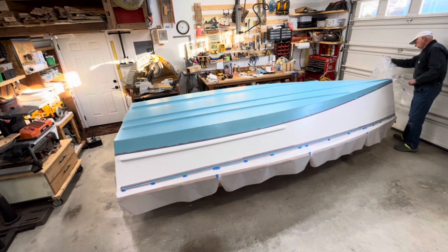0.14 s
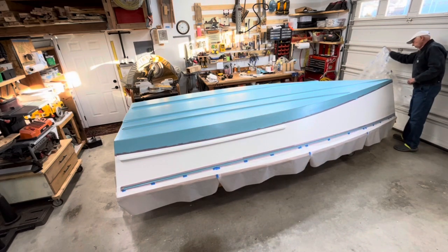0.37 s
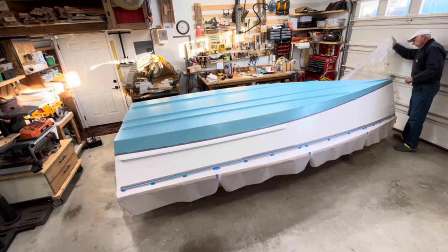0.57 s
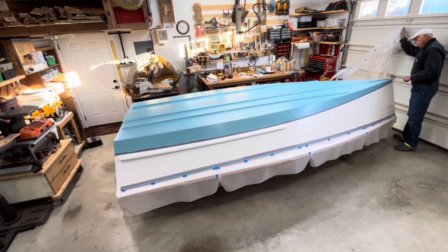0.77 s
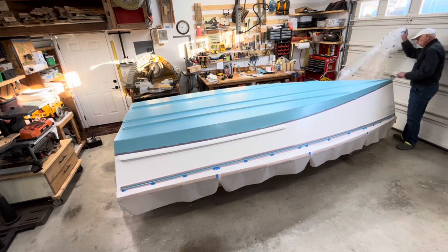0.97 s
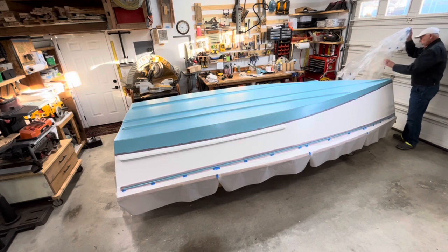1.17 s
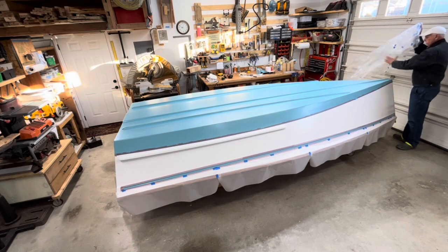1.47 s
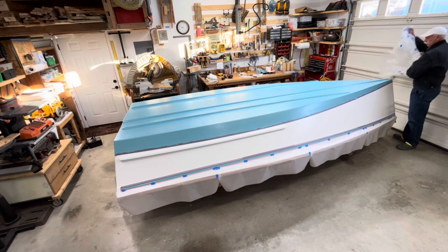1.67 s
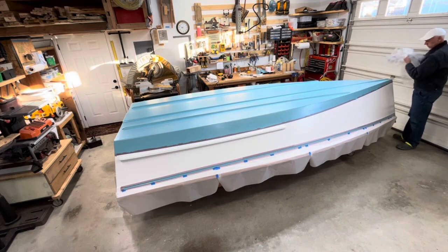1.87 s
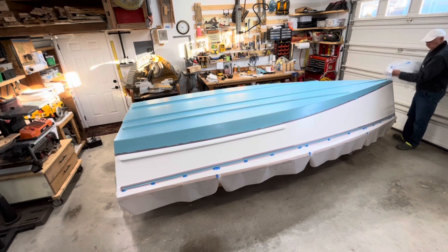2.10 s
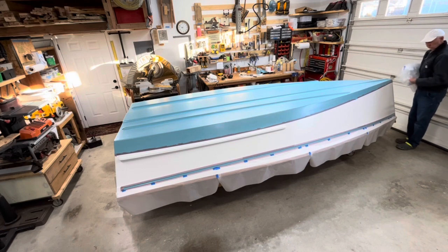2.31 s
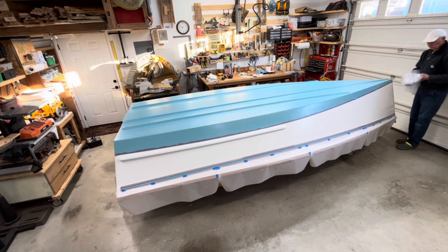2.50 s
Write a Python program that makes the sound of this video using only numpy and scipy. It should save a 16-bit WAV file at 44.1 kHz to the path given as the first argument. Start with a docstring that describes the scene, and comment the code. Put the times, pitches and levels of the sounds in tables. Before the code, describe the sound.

Thin plastic sheeting crinkles faintly, thumps and flaps as it is yanked off a boat hull in two bright swishes, settles briefly, then is crumpled in the hands; close stereo in a quiet, lightly echoing workshop.

```python
"""A faint crinkle, then a thump and a tug: a thin plastic drop cloth is pulled off a boat hull.
It flaps, slides off in two bright sweeps, billows, and is then bunched up by hand in a workshop.
Crinkle, rustle, flaps, thumps and puffs of air are random clicks, shaped in pitch, in a room.
Large folds are ringing bursts of clicks, popping facets are short tones, the swish is smooth noise.
Soft steady noise is the quiet of the workshop."""
import sys
import numpy as np
from scipy import signal
from scipy.fft import rfft, irfft
from scipy.io import wavfile
from scipy.ndimage import uniform_filter1d

SR = 44100
rng = np.random.default_rng(int(sys.argv[2]) if len(sys.argv) > 2 else 0)


def unload_audio(sound):
    """Save the sound as a 16-bit wav file, at the path given as the first command line argument."""
    columns = np.transpose(np.atleast_2d(sound))
    # keep every value between -1 and 1, then stretch to whole-number steps
    steps = np.round(np.clip(columns, -1, 1) * 32767)
    wavfile.write(sys.argv[1], SR, steps.astype(np.int16))


N = 116865
TIME = np.arange(N) / SR
HZ = np.maximum(np.arange(N // 2 + 1) * SR / N, 1)  # kept above zero for the logarithms

# Levels while the sheet is pulled off, before the PULL trims: time_s, crinkle_db, rustle_db
PULL_LEVELS = [(0, -51.5, -48.5), (.07, -52.5, -60), (.16, -52, -57), (.208, -52.5, -52.5),
               (.23, -41.5, -46.5), (0.281, -49, -47.5), (.358, -47.5, -46.5), (.398, -33, -38.5),
               (.45, -37, -36), (.49, -41, -39.5), (.545, -41, -40.5), (.6, -46.5, -45.5),
               (.69, -40, -42.5), (0.759, -46, -40), (.81, -44, -44.5), (.88, -50, -49.5), (1.0, -56, -59),
               (1.11, -53.5, -56.5), (1.38, -58, -59)]
# Levels while it is bunched up, before the BUNCH trims: time_s, crinkle_db, rustle_db
BUNCH_LEVELS = [(1.412, -50, -60), (1.424, -44.5, -51), (1.49, -39.5, -43), (1.605, -40, -43),
                (1.72, -46.5, -49), (1.8, -44.5, -49), (1.9, -41.5, -47.5), (2.045, -44.5, -45.5),
                (2.09, -47.5, -49.5), (2.26, -45.5, -49), (2.38, -47.5, -47.5), (2.48, -50.5, -53),
                (2.55, -49.5, -50.5), (2.65, -54, -51.5)]
# Added to the levels above
PULL_CRINKLE_TRIM_DB, PULL_RUSTLE_TRIM_DB = 4, 5
BUNCH_CRINKLE_TRIM_DB, BUNCH_RUSTLE_TRIM_DB = 2.5, 4.5

# Tone of the open sheet's fine creases, only the shape matters: pitch_hz, level_db (per Hz)
CRINKLE_TONE = [(500, -94), (1500, -3), (3000, -0.5), (4500, -2), (6500, -2), (8000, -4.5), (9400, -1.5),
                (10500, -7.5), (12300, -8.5), (13300, -23), (15500, -15.5)]
# Tone of its wider folds, only the shape matters: pitch_hz, level_db (per Hz)
RUSTLE_TONE = [(40, -26), (90, -4), (150, -10.5), (220, 0), (330, -1), (600, 0), (1300, 0), (2800, -2),
               (4500, -3), (8000, -6.5), (15000, -32)]
# Tone of the bunched sheet's fine creases, only the shape matters: pitch_hz, level_db (per Hz)
WAD_CRINKLE_TONE = [(500, -37), (1500, -10), (3000, -4), (4600, 0.5), (6500, -3), (8000, -2.5),
                    (9400, -1.5), (10500, -7), (12300, -6.5), (13300, -25), (15500, -16.5)]
# Tone of its wider folds, only the shape matters: pitch_hz, level_db (per Hz)
WAD_RUSTLE_TONE = [(40, -23), (90, -10), (200, -6.5), (330, -1.5), (600, 0), (1200, 0), (2800, -2.5),
                   (4500, -7.5), (8000, -10), (15000, -32)]
SNAPS_PER_S, WAD_SNAPS_PER_S, FOLDS_PER_S = 3500, 2200, 1500
SIZE_SPREAD_DB = 3.5  # average extra size of a click above the smallest
PLACES = 3  # spots on the sheet that share the clicks

# Single facets popping in the wad; TICK_DB is relative to crinkle_db in BUNCH_LEVELS
TICKS_PER_S, TICK_DB, TICK_SPREAD_DB = 70, -4.5, 3  # spread is plus or minus
TICK_LOW_HZ, TICK_HIGH_HZ = 1497, 9070
TICK_CYCLES = 10  # cycles until the ring has faded to about a third

# The film slides fast over the hull: full_speed_s, level_db, rise_s, fall_s
SLIDES = [(0.397, -32.5, 0.019, 0.027), (.754, -33.5, 0.026, 0.035)]
# Tone of the sliding film, only the shape matters: pitch_hz, level_db (per Hz)
SWISH_TONE = [(1000, -31), (3000, -4.5), (5500, -6.5), (6700, -0.5), (8000, 0), (9400, -2), (10500, -6.5),
              (12300, -6.5), (13300, -29), (15500, -26)]

# The first thump's body and upper edge (first two rows), then large folds giving way:
# start_s, level_db, resonance_hz, width_hz, decay_s (time constant)
CRUMPLES = [(.212, -45, 1200, 750, 0.11), (.236, -41, 536, 260, .022), (.372, -37.5, 6700, 1300, 0.039),
            (.432, -33, 2700, 2170, 0.065), (.73, -37.5, 5600, 2000, 0.061), (1.414, -45, 4760, 350, 0.025),
            (1.535, -47, 4600, 1600, .06), (1.69, -49, 6800, 900, .018), (1.775, -52, 7300, 1100, .02),
            (2.015, -48.5, 4430, 1500, .045), (2.425, -52, 1840, 500, .018), (2.53, -49, 1220, 800, .03)]
CRUMPLE_ATTACK_S, CRUMPLE_SNAPS_PER_S = 0.0094, 1800

# The slack sheet flaps; from 1.42 s, low thumps as handfuls of the wad are crumpled:
# start_s, level_db, decay_s (time constant)
FLAPS_AND_THUMPS = [(0.206, -34.5, 0.044), (0.266, -40, 0.067), (.318, -40.5, 0.026), (0.427, -38.5, 0.031),
                    (.475, -45, 0.093), (.69, -54, 0.052), (1.42, -54, 0.085), (1.88, -58, 0.59),
                    (2.26, -56, 0.072)]
# Tone of the flaps and low thumps, only the shape matters: pitch_hz, level_db (per Hz)
FLAP_TONE = [(30, -45), (65, -14), (120, -1.5), (200, -3.5), (330, -3.5), (520, -6), (750, -11),
             (1350, -11), (1900, -32), (15000, -70)]
FLAP_ATTACK_S, SLAPS_PER_S = 0.015, 350

# Air pushed by the billowing sheet: time_s, level_db
BILLOW = [(0, -70), (.19, -69), (.23, -66), (.3, -70), (.35, -64), (.4, -68), (.46, -55.5), (.56, -61),
          (.7, -70), (.8, -56), (.86, -60), (.9, -53.5), (.95, -63), (1.0, -60.5), (1.07, -67), (1.15, -62),
          (1.2, -69), (1.4, -76), (1.48, -67), (1.6, -76), (1.88, -68), (2.1, -75), (2.35, -64),
          (2.48, -76), (2.65, -77)]
# Tone of the moving air, only the shape matters: pitch_hz, level_db (per Hz)
AIR_TONE = [(20, -26), (33, -10), (41, 4), (53, 18), (66, 5), (85, -2), (130, -14), (250, -50), (1000, -73)]
PUFFS_PER_S = 300
EVEN_S = 0.03  # time over which a level is evened out

# Tone of the quiet workshop, only the shape matters: pitch_hz, level_db (per Hz)
FLOOR_TONE = [(20, -20), (50, -3), (130, 3.5), (300, 0.5), (1000, 3), (4000, -6.5), (15000, -16)]
FLOOR_DB = -58.5

# Room resonances that colour the lows: pitch_hz, width_hz, boost_db
ROOM_MODES = [(140, 14, -1.5), (185.6, 14, 4), (229, 14, 4), (324.3, 18, 4.5), (456, 14, 2.5),
              (969, 27, 3.5), (1410, 27, 5.5)]
# Likeness of left and right channels by pitch: pitch_hz, correlation (-1 to 1, no unit)
LIKENESS = [(60, 0.96), (160, 0.74), (300, 0.77), (450, -0.093), (740, -0.068), (1400, -0.18),
            (2500, 0.011), (9000, 0.065), (11500, 0.27)]
ROOM_T60_S = 0.32  # time for the echoes to drop by 60 dB
LEFT_LAG_S = 0.000268  # direct sound reaches the left microphone this much later
DIRECT_DB, FLAP_DIRECT_DB = -10, -5  # direct sound against the room's tail

# Difference in microphone colour: pitch_hz, left_minus_right_db
SHADE = [(60, -1), (200, -1), (700, 0.5), (1600, 3), (2500, 1), (3400, 4), (4600, 7.5), (6800, 9.5),
         (7800, 1), (8500, 8), (9400, -10), (10500, 7), (11400, -0.5)]
CUTOFF_HZ = 15800


def sheet():
    """Fine creases crinkle and wider folds rustle, first in the open sheet, then in the wad."""
    crinkle_db, rustle_db = in_time(PULL_LEVELS)
    crinkle = buckling(SNAPS_PER_S, CRINKLE_TONE, DIRECT_DB)
    rustle = buckling(FOLDS_PER_S, RUSTLE_TONE, DIRECT_DB)
    pulled = (from_db(crinkle_db + PULL_CRINKLE_TRIM_DB) * crinkle
              + from_db(rustle_db + PULL_RUSTLE_TRIM_DB) * rustle)

    crinkle_db, rustle_db = in_time(BUNCH_LEVELS)
    crinkle = buckling(WAD_SNAPS_PER_S, WAD_CRINKLE_TONE, DIRECT_DB)
    rustle = buckling(FOLDS_PER_S, WAD_RUSTLE_TONE, DIRECT_DB)
    bunched = (from_db(crinkle_db + BUNCH_CRINKLE_TRIM_DB) * crinkle
               + from_db(rustle_db + BUNCH_RUSTLE_TRIM_DB) * rustle
               + from_db(crinkle_db + TICK_DB) * ticks())

    bunching_start_s = BUNCH_LEVELS[0][0]
    return np.where(TIME < bunching_start_s, pulled, bunched)


def buckling(per_s, tone, direct_db):
    """Clicks of uneven sizes come at random moments, from several places on the sheet; rms 1."""
    heard = 0
    for _ in range(PLACES):
        size_db = SIZE_SPREAD_DB * np.minimum(rng.exponential(1, N), 4)
        sizes = from_db(size_db) * rng.choice([-1, 1], N)
        clicks = sizes * (rng.random(N) < per_s / PLACES / SR)
        heard = heard + rfft(clicks) * workshop(direct_db)
    return rms_one(irfft(heard * from_db(over_hz(tone)), N))


def ticks():
    """Single facets of the wad pop over and ring briefly, each at its own pitch; rms 1."""
    out = np.zeros(N + SR)  # spare room for the last rings
    age = TIME[:SR // 20]
    for when, pitch, size in rng.random((int(TICKS_PER_S * N / SR), 3)):
        hz = TICK_LOW_HZ * (TICK_HIGH_HZ / TICK_LOW_HZ) ** pitch
        start = int(when * N)
        fade = np.exp(-age * hz / TICK_CYCLES)
        # high rings are shorter, so the square root evens out their energy
        ring = np.sqrt(hz) * np.sin(2 * np.pi * hz * age) * fade
        out[start:start + len(age)] += from_db(TICK_SPREAD_DB * (2 * size - 1)) * ring
    return rms_one(irfft(rfft(out[:N]) * workshop(DIRECT_DB), N))


def slides():
    """Where the film runs fast over the paint, friction adds a smooth bright swish."""
    gain = 0
    for peak_s, db, rise_s, fall_s in SLIDES:
        width_s = np.where(TIME < peak_s, rise_s, fall_s)
        gain = gain + from_db(db) * np.exp(-.5 * ((TIME - peak_s) / width_s) ** 2)
    return gain * room_noise(SWISH_TONE)


def crumples():
    """Short resonant bursts of clicks fill out the first thump, then mark large folds giving way."""
    snaps = rfft(buckling(CRUMPLE_SNAPS_PER_S, RUSTLE_TONE, DIRECT_DB))
    out = 0
    for start_s, db, hz, width_hz, decay_s in CRUMPLES:
        resonance = 1 / (1 + 1j * (HZ / hz - hz / HZ) * hz / width_hz)
        # squared: the resonance is applied twice
        burst = evened(rms_one(irfft(snaps * resonance ** 2, N)))
        out = out + from_db(db) * swell(start_s, CRUMPLE_ATTACK_S, decay_s) * burst
    return out


def flaps_and_thumps():
    """Dull, dying flurries of clicks: the slack sheet flaps, later handfuls of the wad thump low."""
    power = 0
    for start_s, db, decay_s in FLAPS_AND_THUMPS:
        power = power + (from_db(db) * swell(start_s, FLAP_ATTACK_S, decay_s)) ** 2
    return np.sqrt(power) * evened(buckling(SLAPS_PER_S, FLAP_TONE, FLAP_DIRECT_DB))


def billowing_air():
    """The billowing sheet pushes air, heard as many small, low puffs that merge."""
    billow_db, = in_time(BILLOW)
    return from_db(billow_db) * evened(buckling(PUFFS_PER_S, AIR_TONE, FLAP_DIRECT_DB))


def quiet_workshop():
    """The background is steady, soft noise without a direction."""
    return from_db(FLOOR_DB) * room_noise(FLOOR_TONE)


def room_noise(tone):
    """Smooth noise without a direction, shaped in pitch; rms 1."""
    noise = diffuse(rng.standard_normal((2, N)))
    return rms_one(irfft(noise * from_db(over_hz(tone)), N))


def workshop(direct_db):
    """Room response: direct sound from the right and a dense fading tail, with low resonances."""
    tail = rng.standard_normal((2, N)) * from_db(-60 * TIME / ROOM_T60_S)
    tail = diffuse(rms_one(tail) / np.sqrt(N))
    lag_s = np.array([[LEFT_LAG_S], [0]])
    direct = np.exp(-2j * np.pi * HZ * lag_s)  # a delay, written as a phase turn
    modes_db = sum(db / (1 + (2 * (HZ - hz) / width) ** 2) for hz, width, db in ROOM_MODES)
    return (from_db(direct_db) * direct + tail) * from_db(modes_db)


def diffuse(pair):
    """Blend two unrelated signals into left and right spectra with the set likeness."""
    mid, side = rfft(pair)
    alike = np.clip(over_hz(LIKENESS), -.99, .99)
    shared = np.sqrt(1 + alike) * mid
    opposed = np.sqrt(1 - alike) * side * [[1], [-1]]
    return (shared + opposed) / np.sqrt(2)


def swell(start_s, attack_s, decay_s):
    """A quick straight rise, then an exponential fall."""
    age = TIME - start_s
    return np.clip(age / attack_s, 0, 1) * np.exp(-np.maximum(age - attack_s, 0) / decay_s)


def evened(x):
    """Hold the short-term level of a stereo sound near rms 1."""
    power = uniform_filter1d(np.mean(x ** 2, axis=0), size=int(EVEN_S * SR))
    return x / np.sqrt(power + 1e-6)


def from_db(db):
    """Turn decibels into a multiplying gain."""
    return 10 ** (np.asarray(db) / 20)


def rms_one(x):
    """Scale to an rms (average strength) of 1."""
    return x / np.sqrt(np.mean(x ** 2) + 1e-20)


def in_time(rows):
    """Join each column of a table by straight lines, giving a value at every sample."""
    s, *columns = np.transpose(rows)
    return [np.interp(TIME, s, column) for column in columns]


def over_hz(points):
    """Join a table by straight lines over log frequency."""
    hz, value = np.transpose(points)
    return np.interp(np.log(HZ), np.log(hz), value)


def scene():
    """The sheet, its slides, crumples, flaps and thumps and the moved air, over the quiet workshop."""
    moving_sheet = sheet() + slides() + crumples() + flaps_and_thumps()
    return moving_sheet + billowing_air() + quiet_workshop()


def record(dry):
    """Each microphone has its own colour, and the very high treble is cut."""
    shade_db = over_hz(SHADE) * np.array([[.5], [-.5]])  # half the difference to each side
    coloured = irfft(rfft(dry) * from_db(shade_db), N)
    # 70 dB down from 700 Hz above the cutoff
    top_cut = signal.cheby2(14, 70, CUTOFF_HZ + 700, fs=SR, output="sos")
    return signal.sosfilt(top_cut, coloured)


dry = scene()
out = record(dry)
unload_audio(out)
```